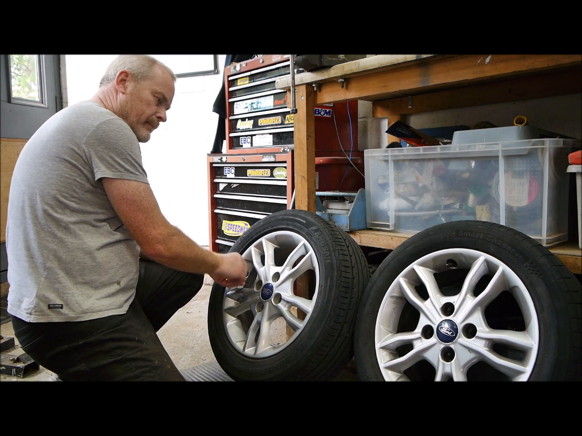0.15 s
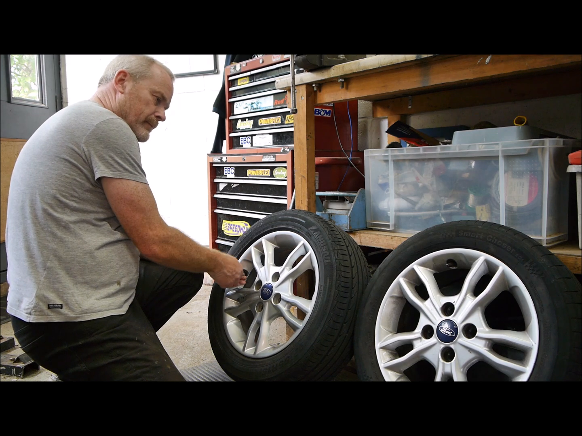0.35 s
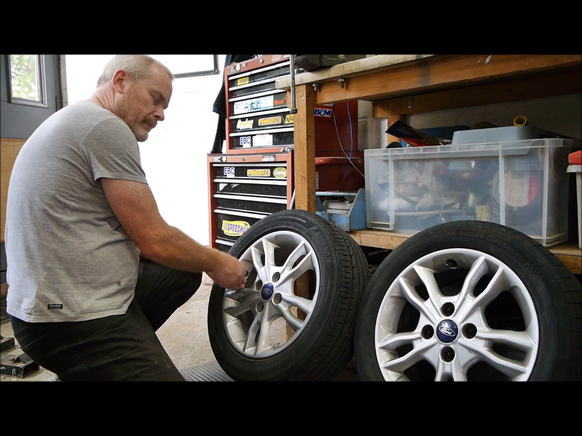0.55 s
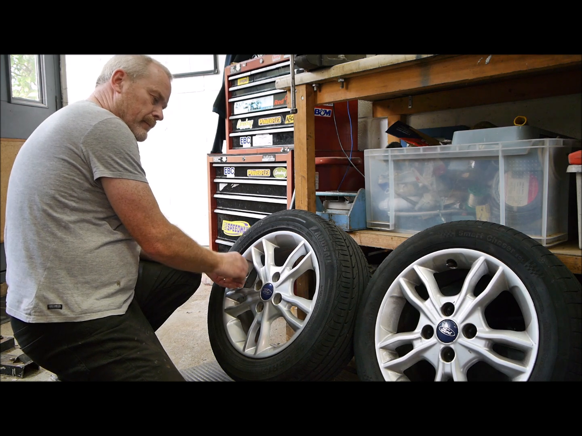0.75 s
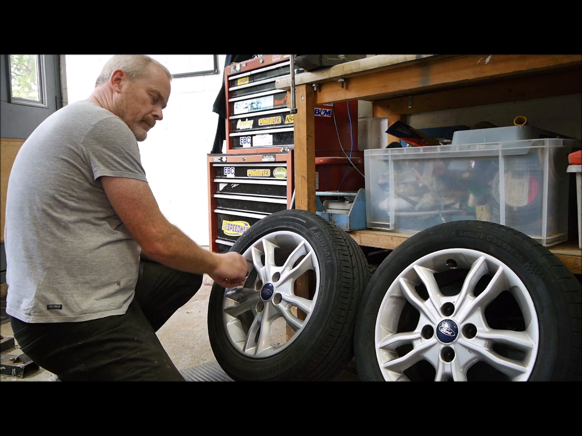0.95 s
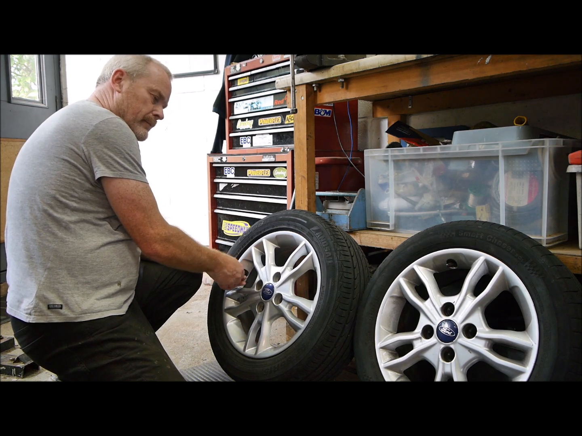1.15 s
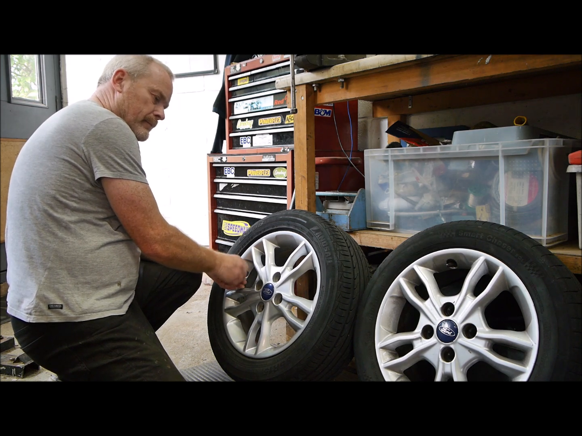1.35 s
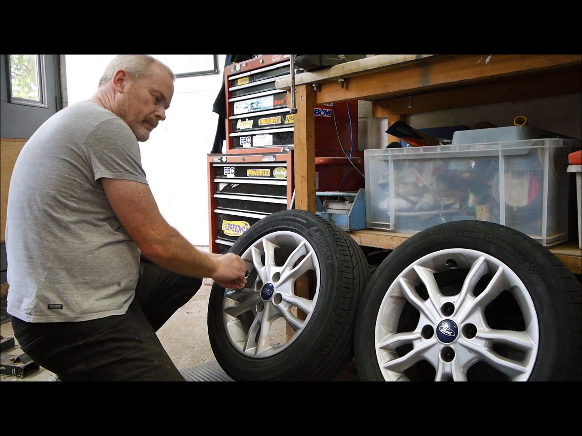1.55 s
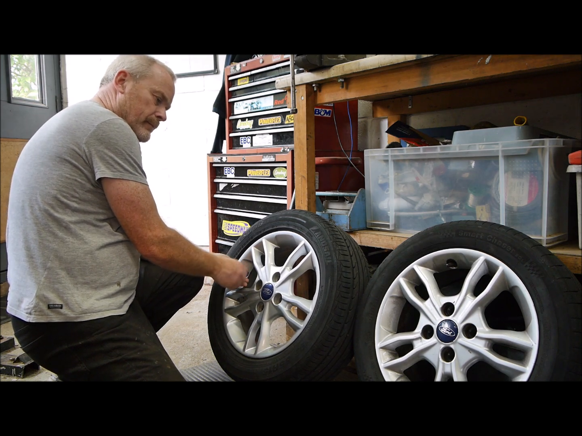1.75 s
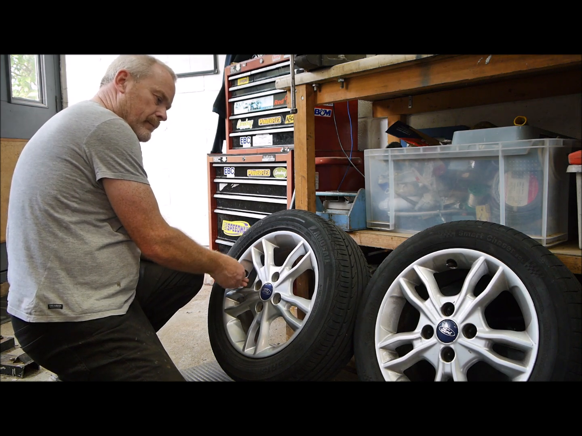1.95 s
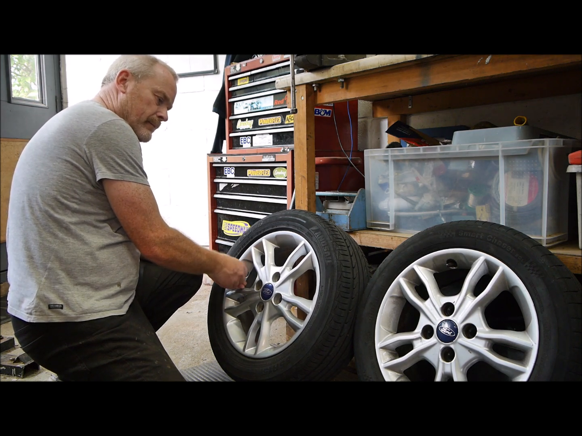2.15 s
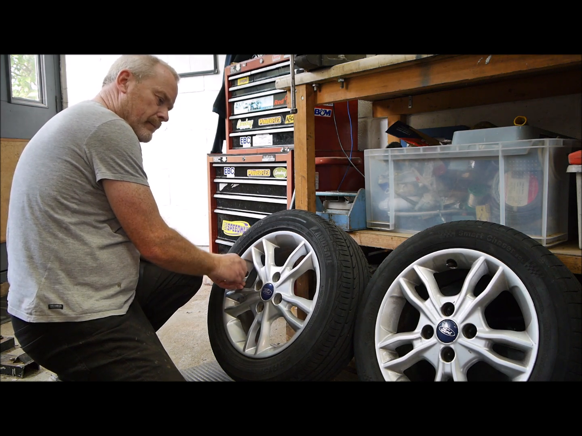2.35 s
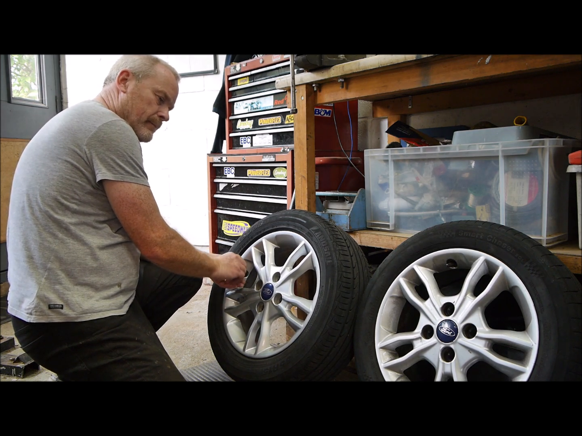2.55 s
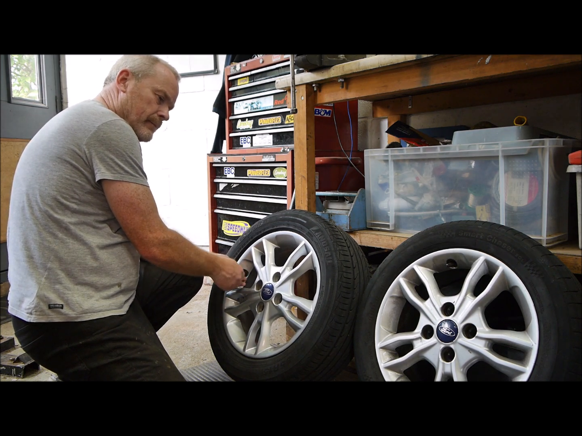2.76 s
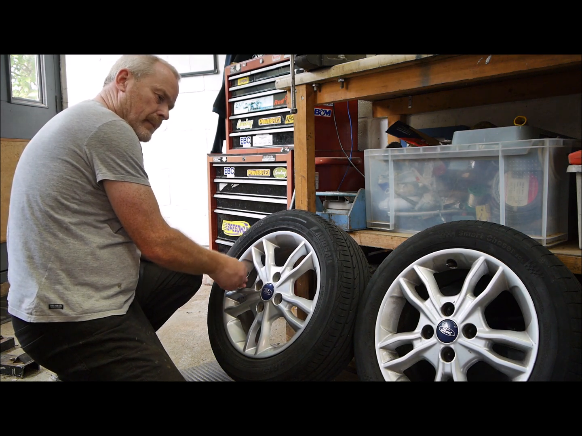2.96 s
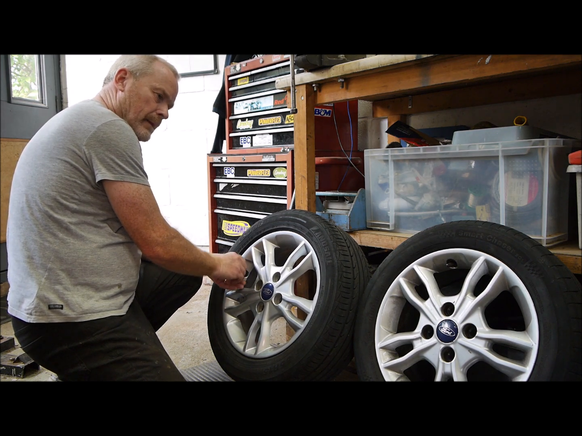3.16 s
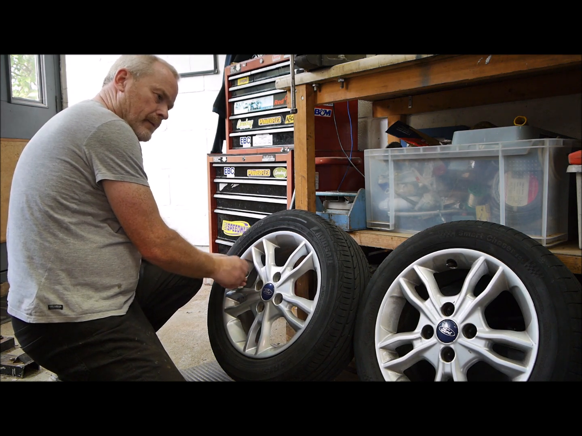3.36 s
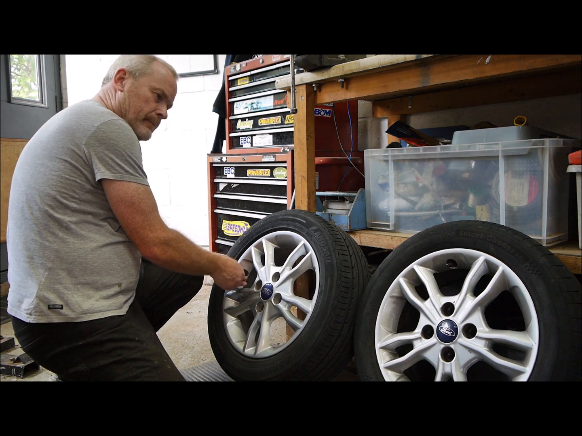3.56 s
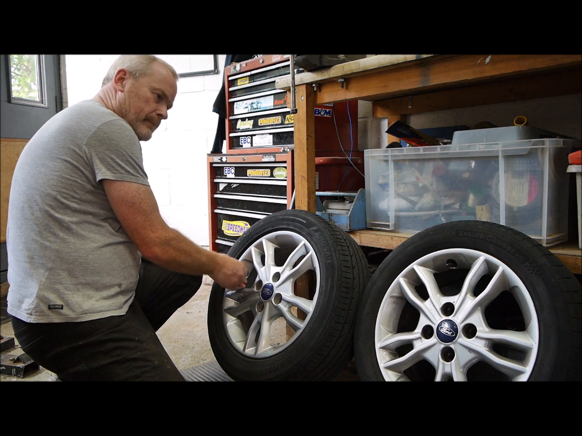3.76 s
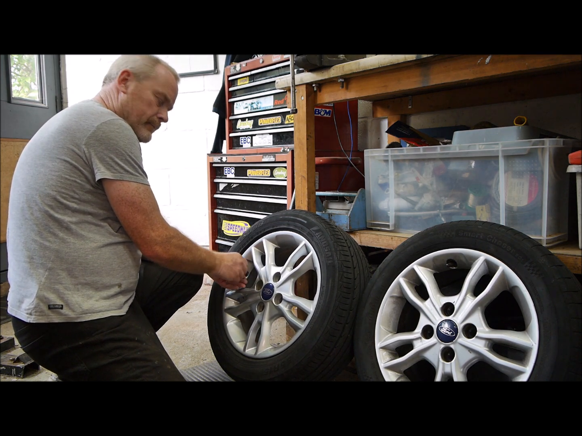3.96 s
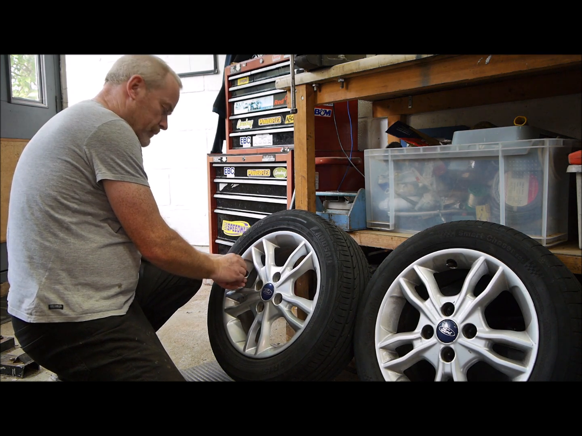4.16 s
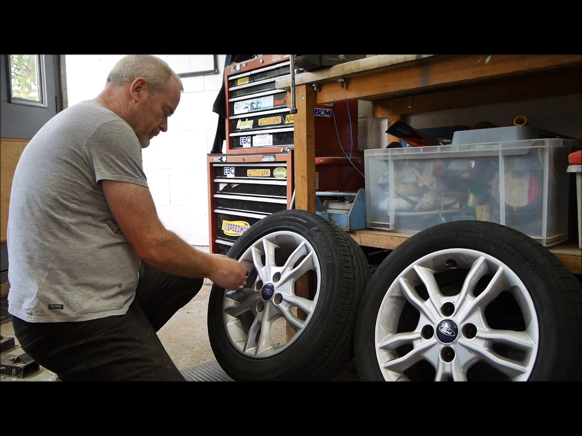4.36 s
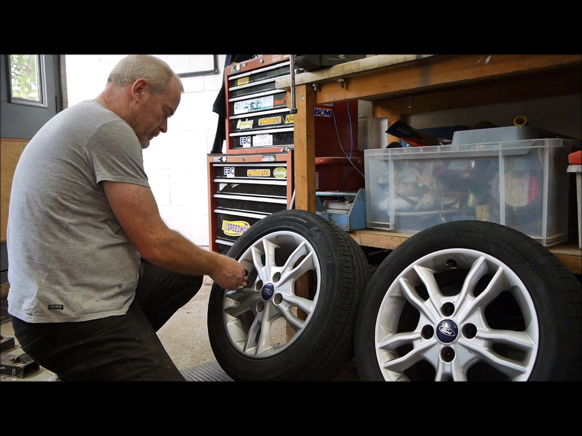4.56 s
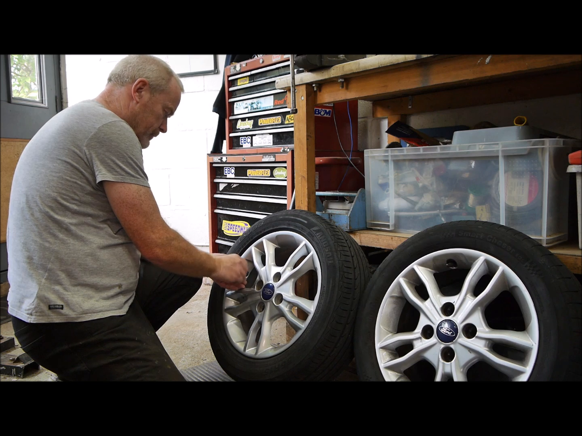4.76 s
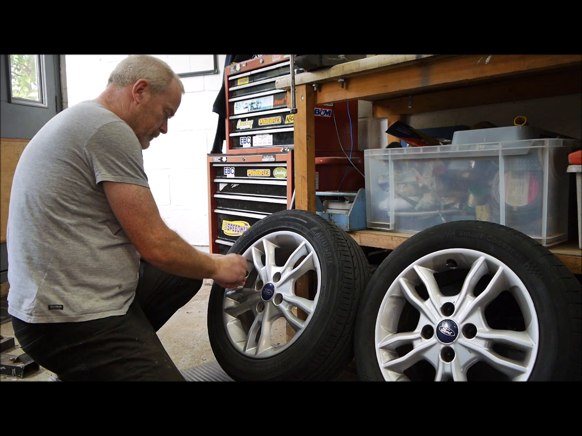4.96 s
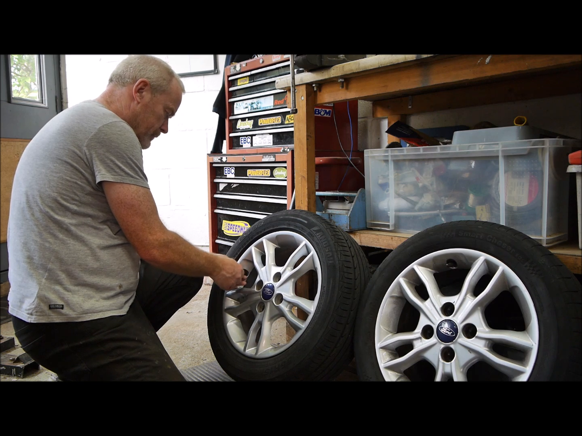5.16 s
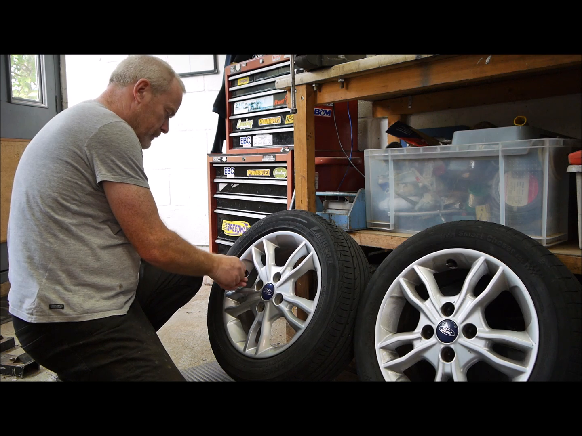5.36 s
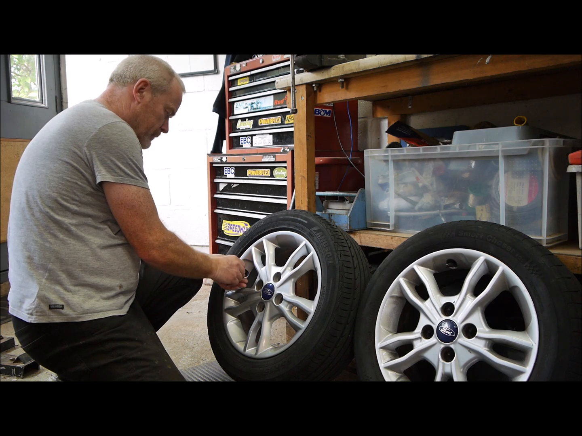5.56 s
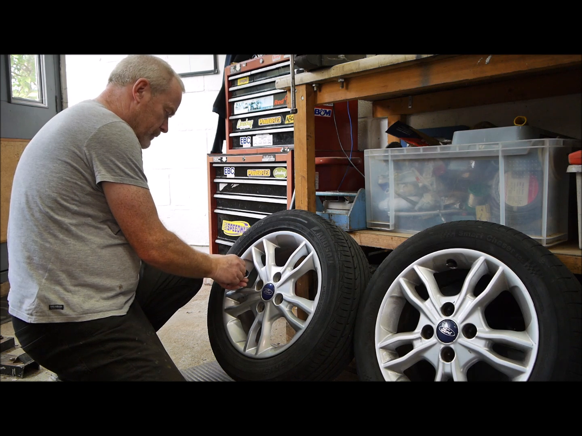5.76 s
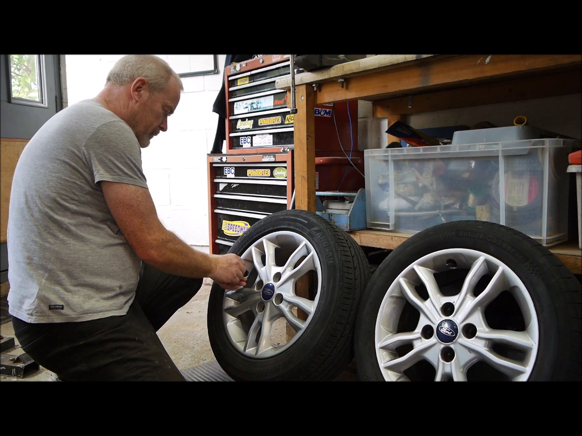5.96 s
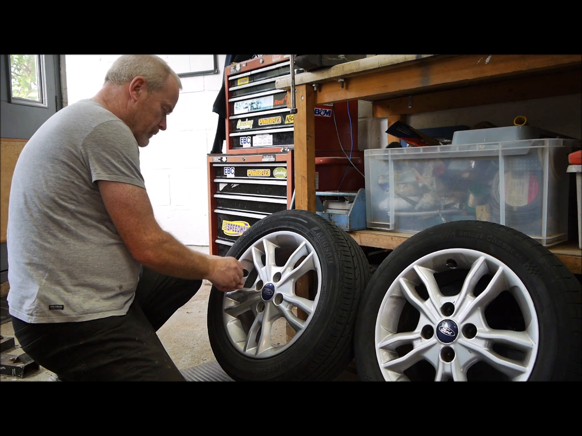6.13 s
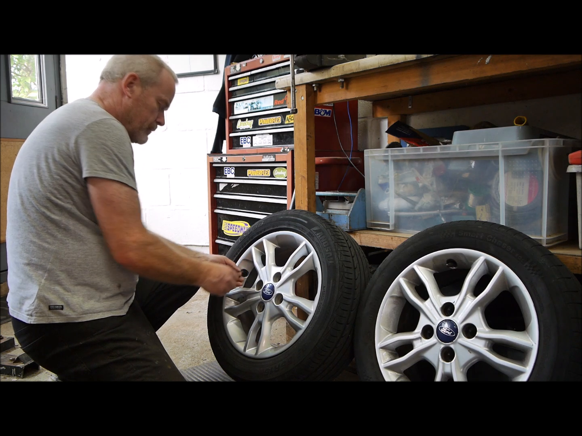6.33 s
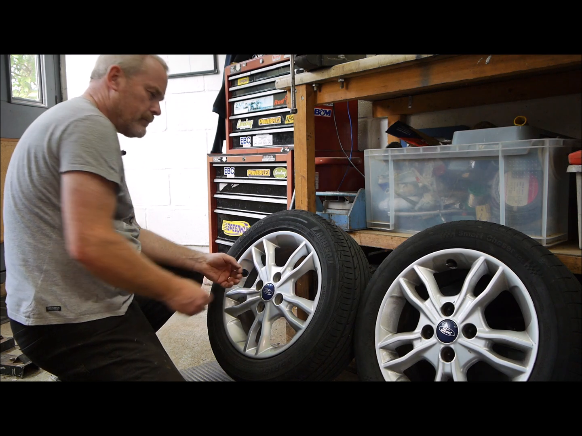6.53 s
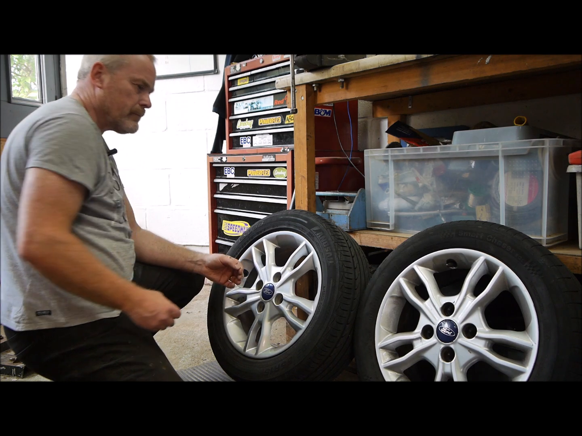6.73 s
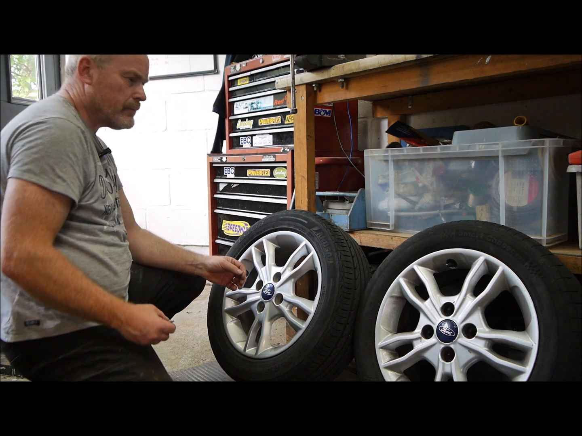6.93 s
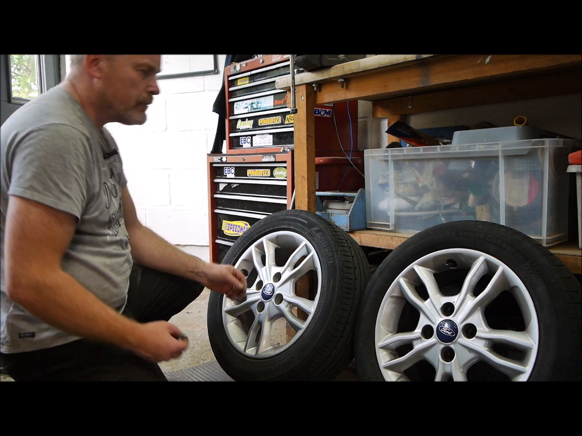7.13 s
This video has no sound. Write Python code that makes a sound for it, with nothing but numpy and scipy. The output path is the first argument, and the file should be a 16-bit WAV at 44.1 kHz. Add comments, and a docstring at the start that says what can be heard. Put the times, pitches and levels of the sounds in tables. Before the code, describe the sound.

Air hisses unevenly from a car tyre valve in a garage, small tool knocks, then a strong rush and a thin, flickering high whistle.

```python
"""In a garage, a valve core is unscrewed from a car tyre. Air hisses and spurts past core and fingers: filtered
noise whose colour crossfades through five shapes of the passage, over a wide low rush. Knocks are damped sines
with a noisy tick. The core comes free, the jet roars, and the open stem starts a thin whistle of three
flickering partials. Under the first seconds wanders a faint hum like a far engine: a gliding sine."""
import sys
import numpy as np
from scipy import signal
from scipy.fft import rfft, irfft, next_fast_len
from scipy.io import wavfile

SR = 44100
rng = np.random.default_rng(int(sys.argv[2]) if len(sys.argv) > 2 else 0)


def unload_audio(sound):
    """Save the sound as a 16-bit wav file, at the path given as the first command line argument."""
    columns = np.transpose(np.atleast_2d(sound))
    # keep every value between -1 and 1, then stretch to whole-number steps
    steps = np.round(np.clip(columns, -1, 1) * 32767)
    wavfile.write(sys.argv[1], SR, steps.astype(np.int16))


N = 317079
T = np.arange(N) / SR
PADDED = next_fast_len(N, True)
FREQS = np.maximum(np.fft.rfftfreq(PADDED, 1 / SR), 1)

# In every table of brief changes, half_length_s is the time from the peak until the change in dB is down to 1/e.

# far hum, fading after the last point: time_s, pitch_hz, level_db
HUM = [(0.0, 89.4, -58), (0.19, 94.2, -66), (0.63, 95.8, -49.5), (1.34, 103.3, -61.5), (1.9, 107, -59),
       (1.97, 97.7, -61), (2.26, 114, -59), (2.95, 88, -64.5), (3.21, 94.7, -61), (3.25, 84.6, -67),
       (3.65, 84.1, -49), (4.0, 86.5, -68)]
HUM_FADE_DB_PER_S = 52
# colour of the dull room tone: frequency_hz, gain_db
ROOM_TONE = [(20, -1), (45, -0.5), (90, 3), (150, -1.5), (300, 0.5), (700, -9), (2000, -42), (8000, -47)]
# loudness of the room tone: time_s, level_db
ROOM_LEVEL = [(0, -57.5), (3.8, -57.5), (5.3, -59.5), (5.7, -68), (7.19, -64.5)]
# tone colour of the part that differs between left and right: frequency_hz, gain_db
APART_COLOUR = [(40, 2), (200, -16), (600, -2.5), (1250, 6), (2400, -1), (4400, -1.5), (8100, 1),
                (16000, 1.5)]

# knocks of tool and hand on the wheel: start_s, level_db, pitch_hz, decay_s, tick_db, tyre_boom_db
# (tick and boom are relative to the knock)
KNOCKS = [(2.5, -34, 696, 0.0004, -6, -15.5), (3.2344, -21, 490, 0.00054, -10, -16),
          (3.4433, -29, 830, 0.0003, -2, -25), (4.1435, -11, 922, 0.00028, -8.5, -30),
          (4.1461, -24, 1155, 0.00023, -1, -22), (4.4, -24, 648, 0.00032, -14, -26),
          (4.4044, -34, 520, 0.0005, -20, -25), (4.956, -34, 900, 0.0006, 8, -17),
          (4.962, -38, 950, 0.00027, 3, -25), (5.055, -30, 960, 0.0003, 8, -11)]
# ring of the small steel tool in every tick: pitch_hz, level_db, decay_s
TOOL_MODES = [(1650, -17, 0.0015), (3000, -7, 0.002), (4360, -4.5, 0.0018)]
KNOCK_LOW_CUT_HZ = 90
TYRE_HZ, TYRE_DECAY_S = 151, 0.014
RIM_HZ, RIM_DB, RIM_DECAY_S = 1080, -27, 0.023  # faint ring of the alloy rim, relative to the knock

# air ringing in a pocket between hand and rim:
# centre_s, half_length_s, pitch_hz (at the centre), glide_hz_per_s, width_hz, level_db
POCKETS = [(1.92, 0.27, 735, 120.5, 170, -51), (1.74, 0.4, 450, -1.5, 160, -56),
           (3.16, 0.15, 765, 0, 93, -48.5), (3.26, 0.31, 230, 0.5, 300, -51.5),
           (3.56, 0.13, 780, -230, 73, -49.5), (2.3, 0.17, 14200, -700, 780, -46),
           (3.7, 0.14, 22000, 0, 750, -45)]

# rough noise just above the whistle as the pressure falls: time_s, level_db
FRAY = [(6.25, -58), (6.48, -46), (6.6, -30), (6.8, -29.5), (6.95, -39), (7.19, -33)]
# the whistle starts flat and settles near the pitch of the bore
WHISTLE_START_S, WHISTLE_HZ, WHISTLE_FLAT_HZ, WHISTLE_SETTLE_S = 6.15, 4001, 130, 0.011
# slow wander and late sag of the fundamental as the tyre empties: time_s, offset_hz
WHISTLE_DRIFT = [(6.45, 1), (6.73, 8), (6.9, 0), (7.02, 0), (7.08, -16), (7.19, -12)]
# the whistle's partials: steady_db, overblown_change_db
PARTIALS = [(-21.5, -15), (-26, 7), (-40, 9.5)]
OVERBLOWN_S = 0.085  # the upper partials lead until the fundamental has built up
# flicker of each partial: depth (side tone relative to the partial), side_tone_offset_hz, width_hz
FLICKER = [(.33, 42, 28), (.9, -10, 60), (1.3, -40, 70)]
# the fundamental loses its hold for an instant: time_s, change_db, half_length_s
FALTERS = [(6.27, -10, 0.0062), (6.35, -11, 0.0075), (6.388, -6, 0.015), (6.519, -23, 0.0047),
           (6.541, -18, 0.0048), (6.66, -33, 0.0069), (6.72, -4, 0.018), (6.785, -18, 0.013),
           (6.826, -21, 0.0061), (6.882, -20, 0.0033), (6.899, -16, 0.0078), (6.955, -11, 0.0083),
           (7.041, -30, 0.0095), (7.181, -9, 0.0088)]
# the swaying jet shifts strength between partials: time_s, half_length_s, first_db, second_db, third_db
SWAYS = [(6.235, 0.016, 8, 3, 4), (6.34, 0.017, 0.5, 10.5, 4), (6.45, 0.072, 4, -0.5, -5),
         (6.505, 0.015, -0.5, -2, 7), (6.625, 0.055, 2, -10, 12), (6.796, 0.02, 8.5, 7.5, 0),
         (7.012, 0.025, -2, 8.5, 0), (7.097, 0.03, -13, 3, 4), (7.171, 0.024, 1, 5.5, 1)]

# how freely the air leaves the valve: time_s, level_db
FLOW = [(0.01, -40), (0.46, -31.5), (1.22, -40.5), (1.57, -37), (2.54, -42), (2.6, -35.5), (3.07, -38),
        (3.38, -36.5), (5.03, -36), (5.16, -32), (5.4, -31), (5.42, -23), (5.53, -22), (5.58, -22),
        (6.14, -22.5), (6.29, -30), (6.44, -27.5), (7.19, -34)]
# the core or a fingertip changes the opening, mostly choking it: time_s, change_db, half_length_s
CHOKES = [(0.11, -5, 0.057), (0.862, -3.5, 0.0056), (1.235, 3.5, 0.01), (1.679, -3.5, 0.024),
          (2.8, -1.5, 0.034), (3.264, -6, 0.017), (4.775, -5.5, 0.033), (4.82, -2, 0.021),
          (4.985, -9.5, 0.073)]
# short spurts as the core shifts in its seat: time_s, change_db, half_length_s
SPURTS = [(0.03, 5, 0.029), (0.776, 3.5, 0.054), (0.904, 7.5, 0.018), (1.36, 1.5, 0.012),
          (1.449, 5, 0.0082), (1.52, 1.5, 0.011), (1.72, 3, 0.008), (2.7, 3, 0.032), (2.744, 5, 0.005),
          (2.894, 4.5, 0.025), (3.13, 4, 0.0077), (3.31, 2.5, 0.024), (3.36, 6.5, 0.011),
          (4.177, 8, 0.0041), (4.462, 3.5, 0.049), (4.72, 7, 0.015), (4.884, 7, 0.01),
          (5.054, 10.5, 0.0066), (5.369, -1.5, 0.0053), (5.487, 6.5, 0.006), (6.015, 0, 0.022),
          (6.138, 2.5, 0.011)]
SPURT_TREBLE_SHARE = 0.88  # spurts are dull: the top octave follows only this share of their dB
# low puff as the core lets go: time_s, change_db, half_length_s
PUFF = (5.487, 5.1, 0.035)
# the five shapes of the passage, pin pressed to stem open:
# change_centre_s, change_length_s, top_octave_db, rush_db (both over the hiss)
STAGES = [(0.0, 0.092, -1, -15.5), (2.548, 0.72, 4, -16.5), (3.852, 1, 0, -16), (5.41, 0.14, -0.5, -16.5),
          (6.153, 0.059, 1, -16.5)]
# the jet grazes fingers and tool, shifting brightness and the ring of the hollow between them:
# time_s, half_length_s, top_octave_change_db, low_mode_change_db, high_mode_change_db, rush_change_db
GRAZES = [(0.4, 0.067, 4, 9, 12, 3), (0.53, 0.066, 6.5, 11, 19.5, 3), (1.365, 0.096, 6, 5, 9, 6.5),
          (1.714, 0.06, 1, -19, -6, -6.5), (2.05, 0.31, 8, -11, 13, 0), (2.713, 0.044, -2, 7, -10, 3),
          (2.873, 0.089, 2, -7.5, 17, -4), (2.992, 0.098, 5, 16, 2, 4), (3.158, 0.3, -1.5, 0, 2, 4.5),
          (3.6, 0.13, -1.5, 0.5, -3.5, 0), (3.764, 0.094, 2, 5, -3.5, -4.5), (4.614, 0.13, 2.5, 4, 5, 1),
          (4.835, 0.094, 0, -8, -4, -5.5), (5.003, 0.052, -0.5, 2, 0, 5.5), (5.305, 0.084, 4.5, -1, 6, 3),
          (6.043, 0.098, 3, -23, -8, 1), (6.213, 0.088, 0.5, -1, -2, -1), (6.388, 0.042, 3.5, 8, 5, 6.5),
          (6.928, 0.39, 8.5, -1, 20.5, -1.5)]

# colour of the wide low rush: frequency_hz, gain_db
RUSH_COLOUR = [(100, -17), (190, -9), (280, -5), (360, -6.5), (480, 0.5), (680, 0), (950, 3), (1550, -0.5),
               (1800, -7.5), (2100, -13)]
# colour of the hiss with the pin pressed: frequency_hz, gain_db
PIN_PRESSED = [(1120, -51), (1900, -19), (2150, -15.5), (2480, -5), (3420, -7.5), (3750, -5), (4280, 4),
               (4930, 5.5), (6620, -3), (7500, -11.5), (7980, -14), (9120, -13.5), (9890, -12.5),
               (13200, -20.5), (14800, -16), (16000, -31)]
# colour of the hiss as the core turns: frequency_hz, gain_db
CORE_TURNING = [(1900, -27), (2150, -19), (2500, -8), (2850, -9), (3400, -7), (3800, -6), (4200, 2),
                (5400, 1), (7000, 1), (7980, -2.5), (8730, 2), (10400, -0.5), (13300, -5), (14400, 2),
                (15700, -9)]
# colour of the hiss around the loose core: frequency_hz, gain_db
CORE_LOOSE = [(1950, -27), (2280, -17), (2700, -9.5), (3300, -9.5), (3900, -13), (4700, -4.5), (5330, -0.5),
              (6270, -3.5), (6900, 0), (7700, 0.5), (8450, -6), (10200, -3), (11200, -9.5), (12100, -5),
              (15700, -10)]
# colour of the hiss as the core comes out: frequency_hz, gain_db
CORE_OUT = [(1950, -20), (2480, -5), (3220, -2), (3850, -9), (4400, 2), (4750, -2.5), (5200, 4.5),
            (6110, -2), (6800, 6), (7600, -2.5), (8420, -10.5), (11200, -12.5), (12100, -11.5),
            (15700, -19.5)]
# colour of the hiss from the open stem: frequency_hz, gain_db
STEM_OPEN = [(2000, -18.5), (2350, -16), (2750, -9), (3600, -6.5), (4200, -1.5), (4650, -1.5), (5200, 0),
             (6000, -6), (7400, -1), (8400, 2.5), (9100, 7.5), (10000, 1.5), (11300, -2.5), (12000, -2),
             (12700, -7), (15700, -11.5)]
# bands in which each noise has rms 1 before its level is set, low and high edge in Hz
HISS_BAND, BRIGHT_BAND, RUSH_BAND = (4300, 7600), (8400, 15500), (900, 1600)
# level changes of the lower hiss: time_s, change_db
LOWER_HISS = [(0.2, 0), (0.9, 0), (1.15, 0), (2.2, 1), (2.75, 2), (3.3, 1.5), (3.6, -5.5), (4.1, 1),
              (4.72, 0), (4.78, -3), (4.92, -3), (4.98, 9), (5.1, 1.5), (6.1, -2), (6.35, 0.5), (6.6, -1),
              (7.19, -3.5)]
LOWER_HISS_TOP_HZ = 4000
# the hollow between fingers, tool and valve as the hand turns: time_s, low_mode_hz, high_mode_hz
HOLLOW = [(0.3, 2570, 9020), (0.6, 2518, 9100), (1.4, 2630, 9900), (1.75, 2620, 9500), (2.2, 2582, 8560),
          (2.7, 2540, 8800), (3.002, 2743, 8800), (3.55, 2525, 9460), (3.9, 2570, 9920), (5.3, 2936, 9440),
          (6.4, 2780, 9200), (6.7, 2770, 8940), (7.19, 2860, 9300)]
# its low and high mode: width_hz, resting_level_over_hiss_db
HOLLOW_MODES = [(300, -20), (560, -16)]
# narrow band in which the stem sings as the core slides out: time_s, pitch_hz, level_over_hiss_db
STEM_RING = [(4.5, 5350, -18), (5.15, 5300, -2), (5.42, 5170, -11), (5.52, 5090, 5), (5.62, 5100, -3),
             (5.8, 5260, -0.5), (6.05, 5520, -9), (6.25, 5540, -4), (6.5, 5200, -37)]
TOP_HZ = 15900  # nothing is heard above this


def undb(db):
    """Decibels to gain."""
    return 10 ** (np.asarray(db) / 20)


def unit(x):
    """Scale to rms 1."""
    return x / np.sqrt(np.mean(np.abs(x) ** 2))


def curves(table):
    """The columns of a table, joined by straight lines in time."""
    s, *columns = np.transpose(table)
    return [np.interp(T, s, column) for column in columns]


def bumps(table):
    """Brief bell-shaped changes of level, in dB."""
    out = np.zeros(N)
    for s, db, length in table:
        near = slice(*np.searchsorted(T, [s - 4 * length, s + 4 * length]))
        out[near] += db * np.exp(-((T[near] - s) / length) ** 2)
    return out


def filtered(x, gain):
    """Apply a gain at every frequency."""
    return irfft(rfft(x, PADDED) * gain, PADDED)[:N]


def colour(points):
    """Gain at every frequency from (Hz, dB) points, falling steeply outside them."""
    hz, db = np.transpose(points)
    skirts = np.minimum(FREQS / hz[0], 1) ** 4 * np.minimum(hz[-1] / FREQS, 1) ** 8
    return undb(np.interp(np.log(FREQS), np.log(hz), db)) * skirts


def noise(gain, band=(0, SR)):
    """Turbulence: white noise with the given colour, rms 1 inside the band."""
    inside = (FREQS >= band[0]) & (FREQS <= band[1])
    return filtered(rng.standard_normal(PADDED), gain) / np.sqrt(np.mean(gain ** 2 * inside))


def walk(rate_hz):
    """Smooth random wander of spread 1, with little motion faster than rate_hz."""
    return noise(1 / (1 + (FREQS / rate_hz) ** 2))


def resonant_noise(hz, width_hz):
    """Turbulence ringing in one resonance whose centre may move, rms 1."""
    gain = 1 / (1 + (FREQS / width_hz) ** 2) ** 2
    carrier = np.exp(2j * np.pi * np.cumsum(hz * np.ones(N)) / SR)
    return unit(np.real((noise(gain) + 1j * noise(gain)) * carrier))


def background(side_db=-9):
    """Dull room tone, partly different in each ear, and a far hum: a sine that drifts in pitch and level."""
    waver_db = 2.8
    hz, db = curves(HUM)
    fade_db = HUM_FADE_DB_PER_S * np.maximum(T - HUM[-1][0], 0)
    hum = unit(np.sin(2 * np.pi * np.cumsum(hz) / SR))
    hum = hum * undb(db - fade_db + waver_db * walk(19))
    gain = colour(ROOM_TONE)
    tone = noise(gain) + undb(side_db) * noise(gain) * np.array([[1], [-1]])
    return hum + undb(curves(ROOM_LEVEL)[0]) * tone


def garage(x, wet_db, apart_db, t60=0.16):
    """Direct sound plus dense reflections of a cluttered room, and a part that differs between left and right."""
    t = T[:SR // 2]
    decay = np.exp(-np.log(1000) * t / t60)  # t60: seconds to fall by 60 dB
    tails = rng.standard_normal((2, len(t))) * decay * (t > 0.002)
    common, apart = (signal.fftconvolve(x, tail / np.sqrt(np.sum(tail ** 2)))[:N] for tail in tails)
    apart = filtered(apart, colour(APART_COLOUR)) * np.array([[1], [-1]])
    return (x + undb(wet_db) * common + undb(apart_db) * apart) / np.sqrt(1 + undb(2 * wet_db))


def damped_sine(t, hz, decay_s):
    """A struck mode: a sine that dies away exponentially."""
    return np.sin(2 * np.pi * hz * t) * np.exp(-t / decay_s)


def knocks(tick_s=0.00037):
    """A rounded thud of the rubber-damped wheel, with rim ring, tick of the tool and soft boom of the tyre."""
    out = np.zeros(N)
    t = T[:SR // 10]
    boom = damped_sine(t, TYRE_HZ, TYRE_DECAY_S)
    rim = undb(RIM_DB) * damped_sine(t, RIM_HZ, RIM_DECAY_S)
    tool = sum(undb(db) * damped_sine(t, hz, decay) for hz, db, decay in TOOL_MODES)
    for s, db, hz, decay, tick_db, boom_db in KNOCKS:
        start = int(s * SR)
        thud = t ** 2 * damped_sine(t, hz, decay)  # t ** 2 rounds the onset
        thud = thud / np.abs(thud).max()
        tick = rng.standard_normal(len(t)) * np.exp(-t / tick_s) + tool
        knock = thud + rim + undb(tick_db) * tick + undb(boom_db) * boom
        out[start:start + len(t)] += undb(db) * knock
    # the microphone passes little deep bass
    low_cut = signal.butter(2, KNOCK_LOW_CUT_HZ, "high", fs=SR, output="sos")
    return signal.sosfilt(low_cut, out)


def pockets():
    """Resonant noise of each air pocket swells, slides in pitch where the hand moves, and fades."""
    out = 0
    for s, length, hz, glide, width, db in POCKETS:
        swell = np.exp(-((T - s) / length) ** 4 / 2)
        out = out + resonant_noise(hz + glide * (T - s), width) * undb(db) * swell
    return out


def chiff(s=6.149, length=0.02, hz=3800, width_hz=900, db=-24.5):
    """The bore rings with a brief burst of rough noise around the start of the tone."""
    return resonant_noise(hz, width_hz) * undb(db) * np.exp(-((T - s) / length) ** 2)


def fray(hz=4150, width_hz=250):
    """Noise beside the whistle, swelling as the jet weakens, receding, then rising again at the end."""
    return resonant_noise(hz, width_hz) * undb(curves(FRAY)[0]) * (T > WHISTLE_START_S)


def whistle(attack_s=0.0071):
    """Vortices lock to the stem's bore: a thin tone that falters, its partials flickering on their own."""
    waver_hz, skirt = 4.5, 0.085
    age = np.maximum(T - WHISTLE_START_S, 0)
    hz = WHISTLE_HZ - WHISTLE_FLAT_HZ * np.exp(-age / WHISTLE_SETTLE_S)
    hz = hz + curves(WHISTLE_DRIFT)[0] + waver_hz * walk(28)
    overblown = np.exp(-(age / OVERBLOWN_S) ** 4)
    out = 0
    for k, ((steady_db, overblown_db), (depth, offset, width)) in enumerate(zip(PARTIALS, FLICKER)):
        falter_db = bumps(FALTERS) if k == 0 else 0
        sway_db = bumps([(s, changes[k], length) for s, length, *changes in SWAYS])
        db = steady_db + overblown_db * overblown + falter_db + sway_db
        phase = 2 * np.pi * np.cumsum((k + 1) * hz) / SR
        # the swirling jet scatters the tone: a blurred side tone beats with it, inside a faint noisy skirt
        beating = unit(walk(width) + 1j * walk(width)) * np.exp(2j * np.pi * offset * T)
        swirl = 1 + depth * beating + skirt * (walk(264) + 1j * walk(286))
        out = out + unit(np.real(swirl * np.exp(1j * phase))) * undb(db)
    return out * np.clip(age / attack_s, 0, 1)


def stage_shares():
    """How far each shape of the passage holds at every moment; the shares add up to 1."""
    changes = [np.clip((T - s) / length + 0.5, 0, 1) for s, length, _, _ in STAGES[1:]]
    opened = [1] + changes + [0]
    return np.array([np.maximum(now - after, 0) for now, after in zip(opened, opened[1:])])


def grazing():
    """Changes in dB of the top octave, the two hollow modes and the rush as the jet grazes the hand."""
    return [bumps([(s, changes[k], length) for s, length, *changes in GRAZES]) for k in range(4)]


def flow_level():
    """Level of the jet in dB, with the moments when it is choked."""
    return curves(FLOW)[0] + bumps(CHOKES)


def rush(buffet_db=0.94, choke_share=0.79, spurt_share=0.99):
    """The slow, wide part of the jet buffets the hand; it follows the flow, its quick changes only in part."""
    flow_db = curves(FLOW)[0] + choke_share * bumps(CHOKES) + spurt_share * bumps(SPURTS)
    stage_db = sum(share * db for share, (*_, db) in zip(stage_shares(), STAGES))
    graze_db = grazing()[-1]
    db = flow_db + stage_db + graze_db + bumps([PUFF]) + buffet_db * walk(48)
    return noise(colour(RUSH_COLOUR), RUSH_BAND) * undb(db)


def stem_ring(width_hz=330):
    """Noise in the stem's own resonance, which slides as the core leaves and wobbles as the core rocks."""
    wobble_hz = 90
    hz, db = curves(STEM_RING)
    hz = hz + wobble_hz * walk(14)
    band = (walk(width_hz) + 1j * walk(width_hz)) * np.exp(2j * np.pi * np.cumsum(hz) / SR)
    return unit(band.real) * undb(db)


def hiss(split_hz=8000, flutter_db=0.55, sputter_db=0.65, drift_db=1.22, body_db=-0.93, top_db=-3.0):
    """Jet noise coloured by the passage of the moment; it flutters and spurts as the core moves."""
    graze_db, low_mode_db, high_mode_db, _ = grazing()
    spurt_db = bumps(SPURTS)
    upper = 1 / (1 + (split_hz / FREQS) ** 20)  # share of power above the split
    passages = [PIN_PRESSED, CORE_TURNING, CORE_LOOSE, CORE_OUT, STEM_OPEN]
    body, top = 0, 0
    # square roots keep the power steady through each crossfade
    for passage, share, (_, _, bright_db, _) in zip(passages, np.sqrt(stage_shares()), STAGES):
        gain = colour(passage)
        body = body + share * noise(gain * np.sqrt(1 - upper), HISS_BAND)
        top = top + share * noise(gain * np.sqrt(upper), BRIGHT_BAND) * undb(bright_db)
    body = body * undb(body_db + spurt_db + drift_db * walk(5.3))
    top = top * undb(top_db + graze_db + SPURT_TREBLE_SHARE * spurt_db + drift_db * walk(11))
    air = body + top
    lower = filtered(air, 1 / (1 + (FREQS / LOWER_HISS_TOP_HZ) ** 20))
    air = air + lower * (undb(curves(LOWER_HISS)[0]) - 1)
    mode_changes = (low_mode_db, high_mode_db)
    for hz, (width, rest_db), change_db in zip(curves(HOLLOW), HOLLOW_MODES, mode_changes):
        air = air + resonant_noise(hz, width) * undb(rest_db + change_db)
    return (air + stem_ring()) * undb(flow_level() + flutter_db * walk(33) + sputter_db * walk(270))


def off_hands(x):
    """Reflections from the moving hands and the rim comb the hiss with slowly sliding ripples."""
    lags_s, gain, sway = (0.0013, 0.0027, 0.0046, 0.0071), 0.18, 0.03
    echoes = sum(np.interp(T - lag * (1 + sway * walk(0.87)), T, x) for lag in lags_s)
    return (x + gain * echoes) / np.sqrt(1 + len(lags_s) * gain ** 2)


def scene():
    """All layers together; the whistle is kept nearly dry, so its left-right balance stays steady."""
    jet = off_hands(hiss()) + rush() + pockets() + chiff() + fray()
    air = garage(jet, wet_db=-14.5, apart_db=-17.5)
    tone = garage(whistle(), wet_db=-28, apart_db=-23)
    taps = garage(knocks(), wet_db=-10, apart_db=-17)
    return background() + taps + tone + air


def record(dry, balance_db=0.13):
    """Left is lowered and right raised by balance_db; a steep filter cuts the top."""
    sound = dry * undb([[-balance_db], [balance_db]])
    top_cut = signal.ellip(10, 0.1, 80, TOP_HZ, fs=SR, output="sos")
    return signal.sosfilt(top_cut, sound)


dry = scene()
out = record(dry)
unload_audio(out)
```